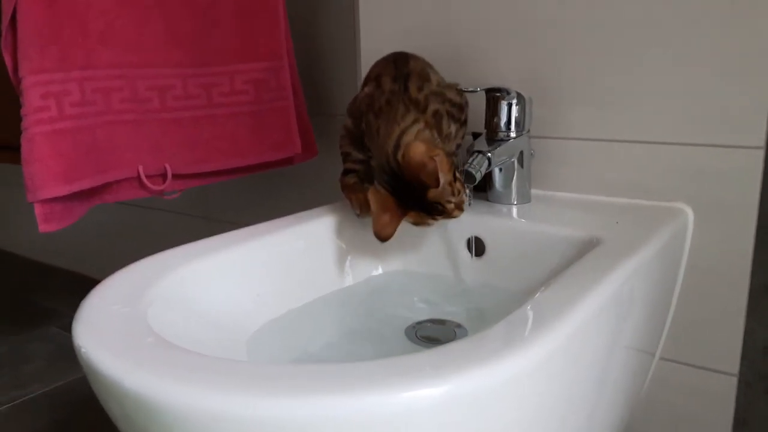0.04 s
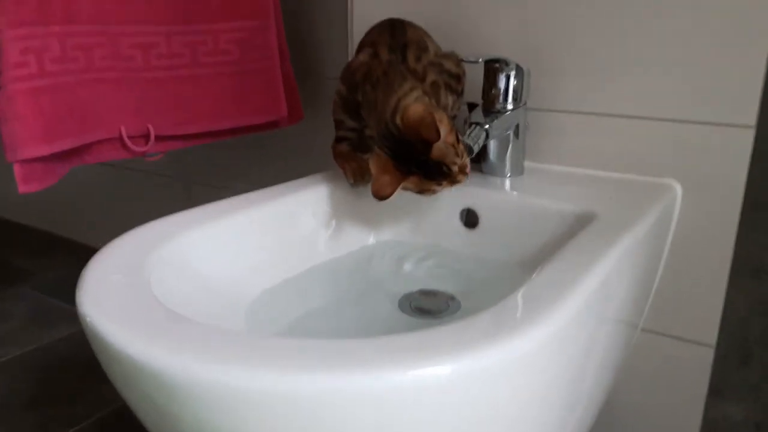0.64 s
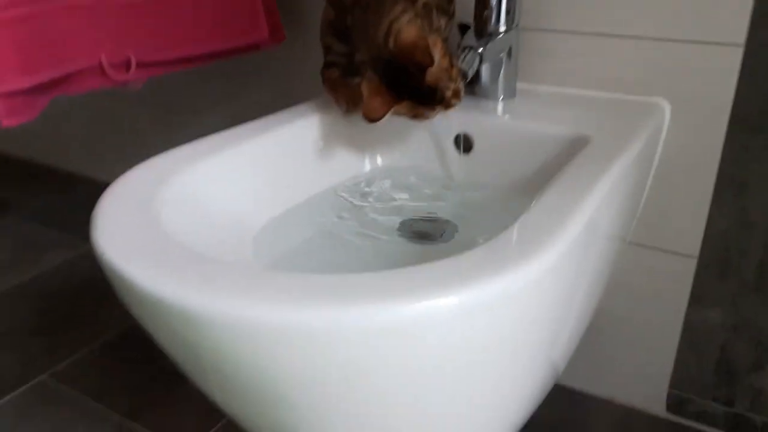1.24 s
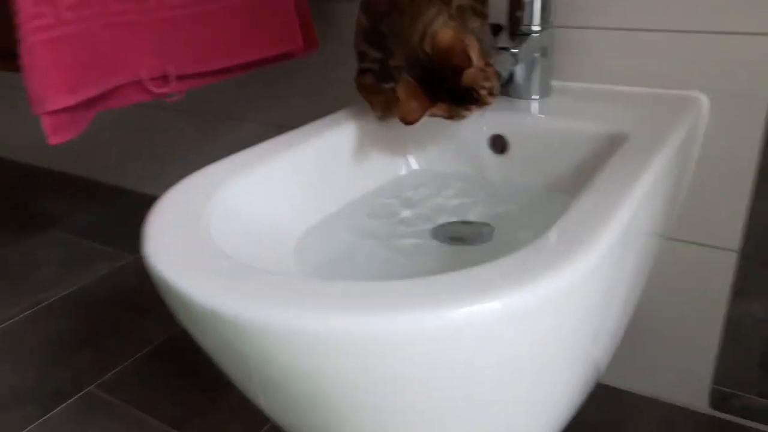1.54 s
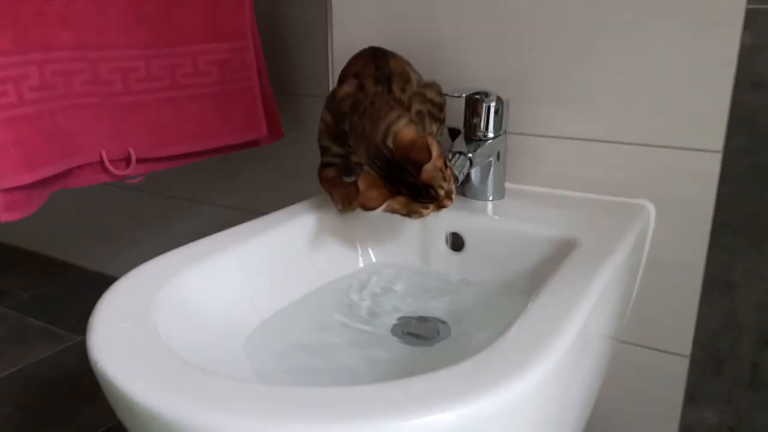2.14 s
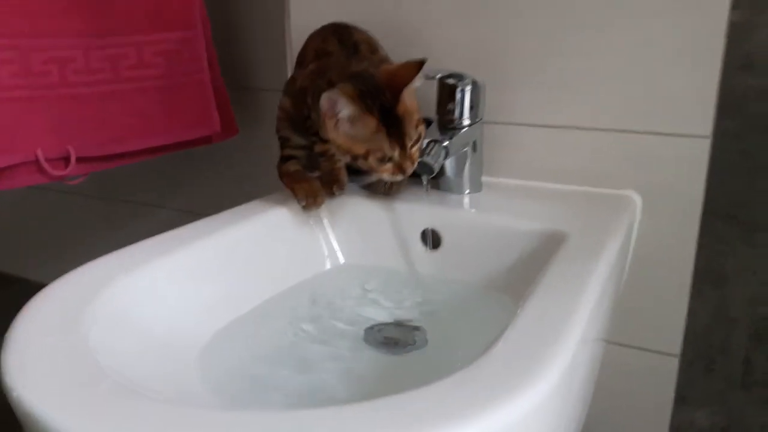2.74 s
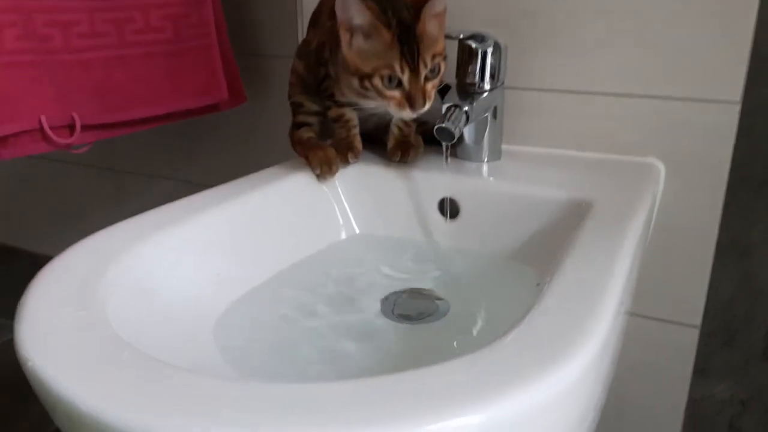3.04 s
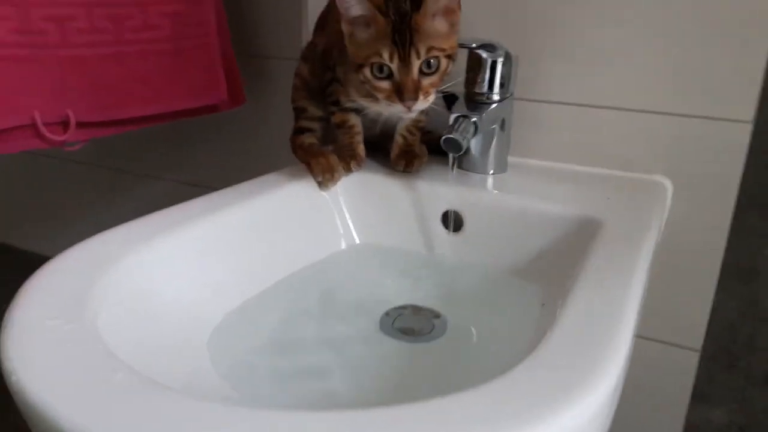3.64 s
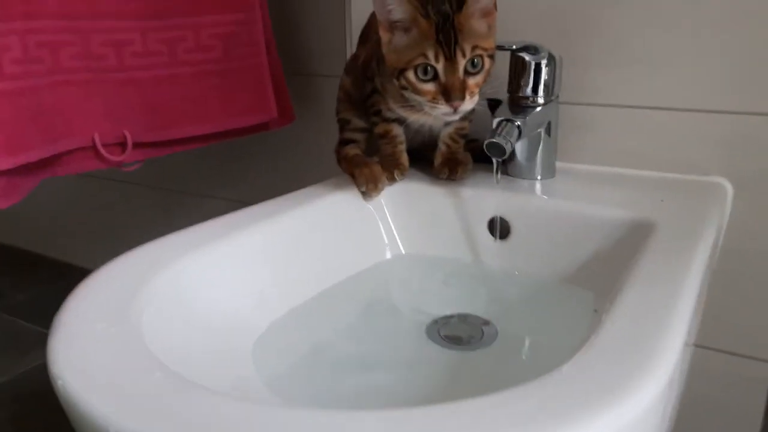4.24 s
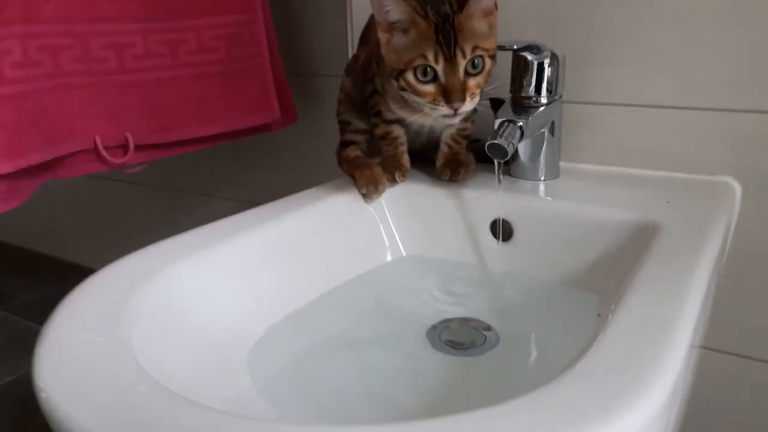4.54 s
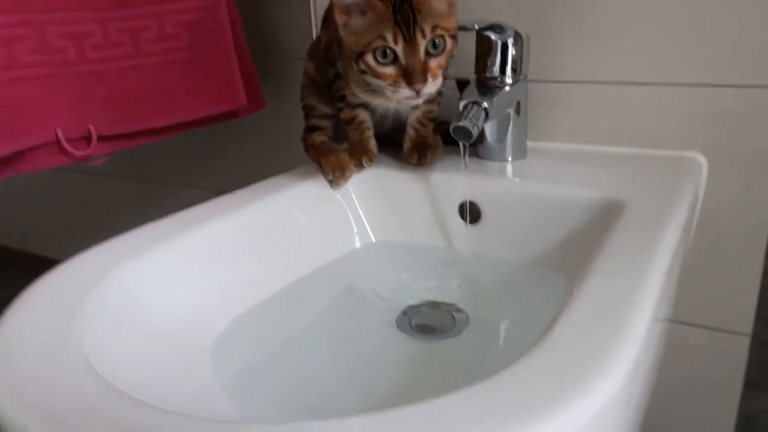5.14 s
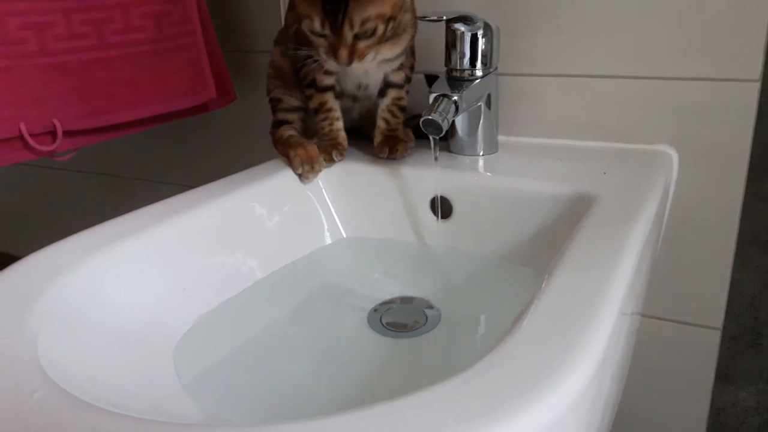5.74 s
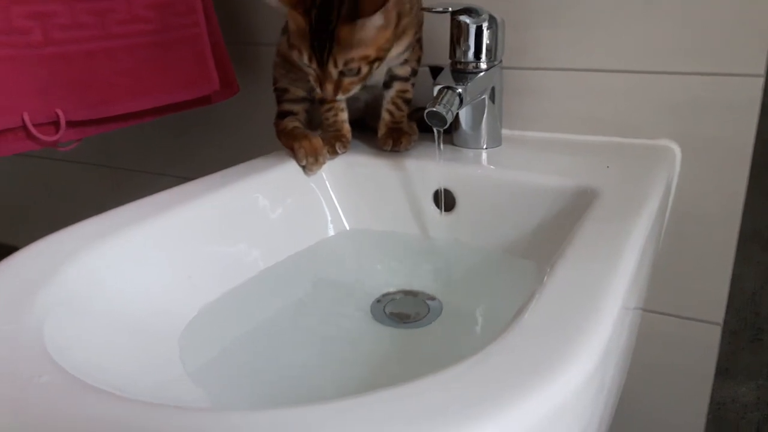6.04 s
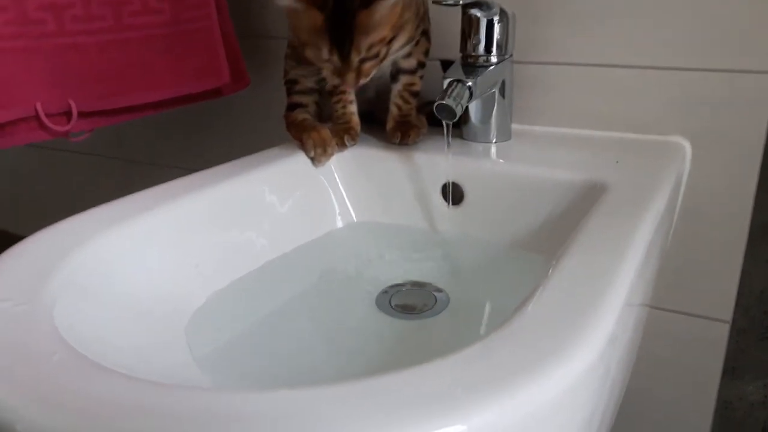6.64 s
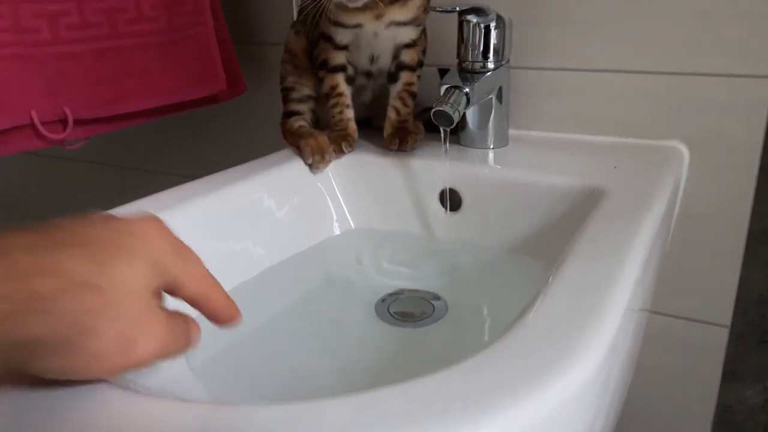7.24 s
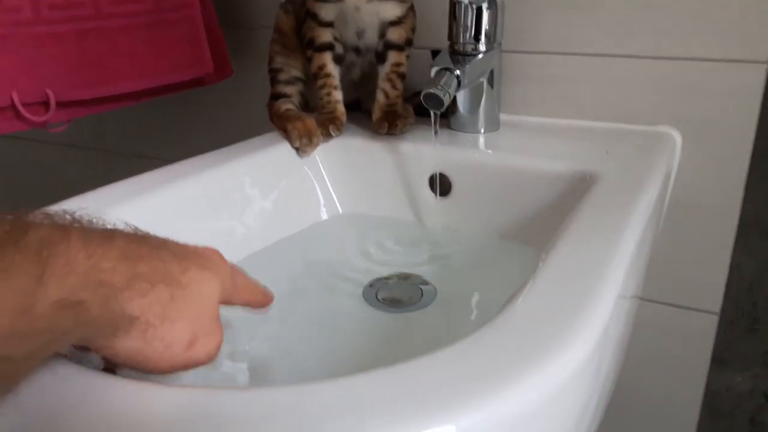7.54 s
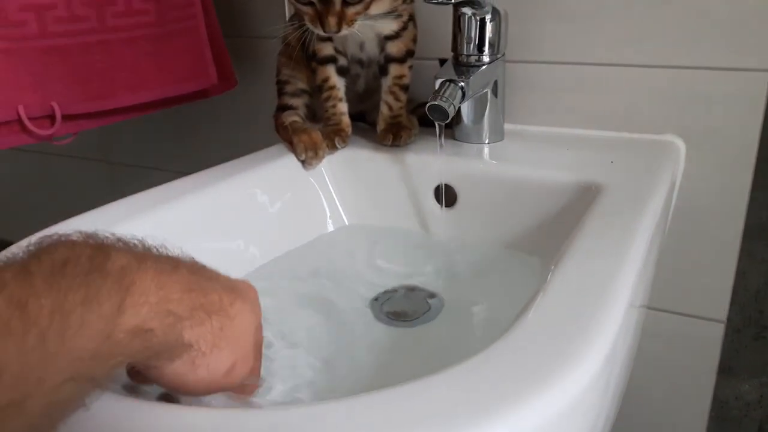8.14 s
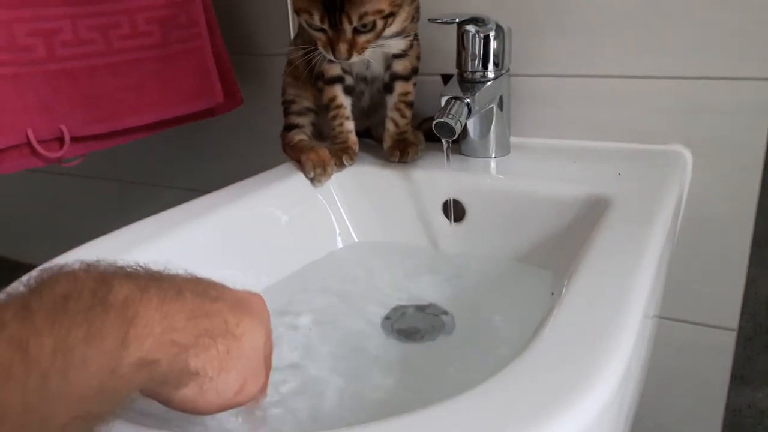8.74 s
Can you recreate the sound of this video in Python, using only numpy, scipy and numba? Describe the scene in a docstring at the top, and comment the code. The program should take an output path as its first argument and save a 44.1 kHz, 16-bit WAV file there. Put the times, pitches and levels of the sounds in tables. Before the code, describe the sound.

Water trickles softly from a tap into standing water in a small bathroom, with loud handling bumps and rubbing at the start.

```python
"""A small tiled bathroom, where a thin stream from a tap trickles into a partly filled ceramic basin.
The stream traps air: big bubbles plop, small ones plink with a rising pitch, and the tiles echo them.
For the first two seconds fingers rub and knock on the phone's case, right next to the microphone;
then the hand settles with soft creaks. Near the end a finger stirs the water. Quiet room air lies below."""
import sys
import numpy as np
from scipy import signal
from scipy.fft import rfft, irfft
from scipy.io import wavfile
from scipy.ndimage import uniform_filter1d
from numba import njit

SR = 44100
rng = np.random.default_rng(int(sys.argv[2]) if len(sys.argv) > 2 else 0)


def log_audio(samples):
    """Write samples as a 16-bit WAV file to the path given in sys.argv[1]."""
    # one column per channel
    frames = np.atleast_2d(samples).T
    # limit to full scale, then quantise
    limited = np.clip(frames, -1, 1)
    pcm = np.round(limited * 32767).astype(np.int16)
    wavfile.write(sys.argv[1], SR, pcm)


N = 388080
TIME = np.arange(N) / SR

# the stream slowly weakens: (time [s], big bubble level [dB], small bubble level [dB])
STREAM_FLOW = [(1.9, -63, -65), (2.3, -56, -68), (2.7, -50.5, -59), (2.95, -65, -70), (3.25, -54.5, -62),
               (3.6, -64.5, -67), (3.85, -65, -64.5), (4.4, -58, -66.5), (5.0, -61, -69.5), (5.6, -58, -68),
               (6.0, -64, -71.5), (6.7, -63, -71), (7.1, -63, -64), (7.35, -63.5, -74), (7.75, -59.5, -69),
               (8.2, -72, -72), (8.55, -57.5, -67.5), (8.8, -73, -73.5)]
# the stream falters and traps less air: (time [s], length [s])
STREAM_LULLS = [(1.918, 0.13), (2.873, 0.048), (4.063, 0.07), (4.638, 0.051), (5.085, 0.203),
                (6.399, 0.061), (6.987, .06), (7.362, 0.12), (8.099, 0.17)]
# the size of the big bubbles wanders: (time [s], pitch [Hz])
GURGLE_PITCH = [(2.0, 816), (3.13, 741.4), (3.21, 620), (3.42, 800), (3.52, 695), (4.58, 677), (4.69, 758),
                (6.45, 687), (6.83, 801), (6.96, 730.5), (8.23, 677), (8.5, 861), (8.53, 698), (8.8, 748)]
# spectra of splashing water and of ticking droplets: (frequency [Hz], level [dB])
SPLASH_COLOUR = [(300, -15), (700, 5.5), (1150, 5), (1700, -6.5), (2500, -7.5), (3700, -17.5),
                 (4600, -24.5), (9000, -34), (16000, -34)]
TICK_COLOUR = [(4000, -32), (9000, -11.5), (12500, -4), (15500, -0.5)]
def trickle():
    """The stream in the basin: a gurgle of big bubbles, a chatter of small ones, splash and spatter."""
    lulls = sum(envelope(s, length, attack_s=.0073, release_s=.0073) for s, length in STREAM_LULLS)
    big_db, small_db = curves(STREAM_FLOW) - 6.5 * lulls
    gurgle_hz, = curves(GURGLE_PITCH)
    gurgle = swarm(gurgle_hz, per_s=90, octaves=.18, cycles=12, rise=.03, swell=.21, spread_db=13)
    middle = swarm(1180, per_s=90, octaves=.34, cycles=10, rise=.05, swell=.25, spread_db=16.5)
    chatter = swarm(2380, per_s=130, octaves=.54, cycles=8, rise=.13, swell=.32, spread_db=21.5)
    chatter *= undb(1.7 * wander(9))  # the stream wobbles, so small bubbles come in bunches
    splash = unit(colour(crackle(900, 4.5), SPLASH_COLOUR))
    spatter = unit(colour(crackle(25, 3.3), TICK_COLOUR))
    fine = undb(-1.7) * middle + undb(-5.5) * chatter + undb(-4) * splash + undb(-22.5) * spatter
    return undb(big_db - 1.5) * gurgle + undb(small_db) * fine


def bubble(hz, cycles, rise, swell):
    """A trapped bubble swells, climbs in pitch as it nears the surface and dies after some cycles."""
    age = np.linspace(0, 1, int(cycles / hz * SR))
    pitch = hz * (1 + rise * age)
    strength = age ** swell * (1 - age) ** 2
    return np.sin(2 * np.pi * np.cumsum(pitch) / SR) * strength / strength.max()


def swarm(centre_hz, per_s, octaves, cycles, rise, swell, spread_db):
    """Bubbles born at random around a pitch or a pitch curve, at an rms of 1."""
    out = np.zeros(N)
    centre_hz = np.broadcast_to(centre_hz, N)
    for when, size, detune, life, lift in rng.random((int(per_s * N / SR), 5)):
        hz = centre_hz[int(when * N)] * 2 ** (octaves * (2 * detune - 1))
        ring = bubble(hz, cycles * (.5 + life), 2 * rise * lift, swell)
        add(out, when * N / SR, undb(spread_db * size) * ring)
    return unit(out)


# the loudest big bubbles: (time [s], level [dB], pitch [Hz])
PLOPS = [(.694, -46, 956), (1.868, -48, 925), (2.07, -32, 846), (2.154, -33, 832), (2.26, -30.5, 760),
         (2.295, -37, 857), (2.441, -46, 880), (2.772, -47, 753), (2.975, -44, 773), (3.058, -31.5, 768),
         (3.176, -41, 603), (3.342, -41.5, 766), (3.718, -42.5, 695), (3.961, -43, 679), (4.005, -44, 654),
         (4.202, -47, 684), (4.259, -47, 772), (4.475, -46.5, 631), (4.837, -48.5, 800),
         (4.995, -40.5, 710), (5.036, -50, 699), (5.29, -37, 760), (5.365, -46.5, 713), (5.674, -45.5, 703),
         (6.522, -43.5, 700), (6.715, -44.5, 804), (6.914, -47.5, 708), (7.072, -41, 723),
         (7.154, -42.5, 768), (7.249, -45.5, 714), (7.851, -48, 717), (8.345, -44.5, 785),
         (8.399, -44.5, 713), (8.496, -43, 960), (8.528, -46.5, 666)]
# the loudest small bubbles at the surface: (time [s], level [dB], nominal pitch [Hz])
PLINKS = [(2.241, -45, 2700), (2.328, -52, 2940), (2.524, -55, 2940), (2.866, -54.5, 2150),
          (2.961, -55, 2230), (3.281, -60, 2310), (3.596, -51, 2640), (3.715, -53.5, 2500),
          (3.846, -52, 2200), (4.363, -50, 2280), (4.657, -55, 2260), (4.747, -52, 2390),
          (4.817, -50.5, 2180), (5.035, -55, 2960), (5.244, -50.5, 1860), (5.504, -50, 1840),
          (5.587, -51, 2140), (5.714, -47.5, 2040), (6.137, -53, 2000), (6.418, -55, 2140),
          (7.645, -51.5, 2620), (8.27, -43, 2660)]
# drops bursting into spray: (time [s], level [dB], decay time [s])
SPLASHES = [(2.24, -57.5, 0.11), (3.225, -69, 0.073), (3.51, -52.5, 0.021), (3.719, -55.5, 0.019),
            (3.955, -53, 0.019), (4.475, -54.5, 0.024), (5.362, -52.5, 0.0097), (5.70, -64.5, .03),
            (5.29, -55, 0.015), (7.072, -56.5, 0.046), (8.268, -55, 0.028), (8.344, -54.5, 0.012),
            (8.495, -55.5, 0.028)]
def drips(smack_s=.0065):
    """Single drops smack the water, trap loud bubbles or burst into spray."""
    bubbles, smacks = np.zeros((2, N))
    t = np.arange(SR // 5) / SR
    for s, db, hz in PLOPS:
        add(bubbles, s, undb(db - 1) * bubble(hz, cycles=17.3, rise=.05, swell=.25))
        add(smacks, s, undb(db - 19) * noise_burst(t, smack_s))
    for s, db, hz in PLINKS:
        plink = bubble(.96 * hz, cycles=rng.uniform(17, 21.6), rise=.53, swell=.28)
        add(bubbles, s, undb(db - 1) * plink)
    for s, db, decay_s in SPLASHES:
        add(smacks, s, undb(db) * crackle(3000, 2.7)[:len(t)] * np.exp(-t / decay_s))
    return bubbles + colour(smacks, SPLASH_COLOUR)


# droplets landing: (time [s], high tick level [dB], lower click level [dB])
DROPLET_HITS = [(1.862, -46, -47), (2.0968, -49, -52.5), (2.178, -46, -52), (2.326, -41, -51.5),
                (2.524, -44.5, -56), (2.7641, -54, -57), (3.7204, -58.5, -77), (3.961, -58, -75),
                (4.8364, -54, -62), (4.9097, -52, -83), (5.0495, -47.5, -72), (5.362, -49, -55.5),
                (6.321, -54, -62), (6.3494, -54, -69), (6.4735, -53, -62), (6.5565, -57, -59.5),
                (8.2681, -53, -78), (8.7574, -48.5, -54.5)]
# spectrum of the lower click: (frequency [Hz], level [dB])
CLICK_COLOUR = [(1500, -9), (4300, -4), (7000, -3), (11000, -37), (15000, -31)]
def droplets(impact_s=.00085, mist_s=.068):
    """Droplets tick on the ceramic and the tap; fine spray settles after each impact."""
    ticks, clicks = np.zeros((2, N))
    t = np.arange(SR // 5) / SR
    for s, tick_db, click_db in DROPLET_HITS:
        impact, mist = noise_burst(t, impact_s), noise_burst(t, mist_s)
        add(ticks, s, undb(tick_db - 3) * (impact + .093 * mist))
        add(clicks, s, undb(click_db - 5) * (impact + .12 * mist))
    return colour(ticks, TICK_COLOUR) + colour(clicks, CLICK_COLOUR)


def breakup(count=3, wait_s=.015, span_s=.07, octaves=.12):
    """Each plop breaks up into a few weaker bubbles near its own pitch, the later the softer."""
    out = np.zeros(N)
    for s, db, hz in PLOPS:
        for late, detune in rng.random((count, 2)):
            pitch = hz * 2 ** (octaves * (2 * detune - 1))
            ring = bubble(pitch, cycles=18.5, rise=.034, swell=.18)
            add(out, s + wait_s + span_s * late, undb(db - 14.5 - 6 * late) * ring)
    return out


# finger strokes beside the microphone:
# (time [s], length [s], drag level [dB], hiss level [dB], hollow resonance [Hz], treble gain [dB])
FINGER_STROKES = [(.008, 0.031, -28.5, -42, 528, -10.5), (0.074, 0.097, -46, -55.5, 694, -7.5),
                  (0.147, 0.13, -49, -58.5, 571, -6.5), (0.295, .1, -51.5, -63, 610, -6.5),
                  (0.383, 0.049, -38.5, -56, 531, -1), (0.452, 0.14, -41.5, -55, 1000, -4),
                  (0.757, 0.1, -44, -49, 900, -8), (0.852, 0.094, -41.5, -48, 947, 0.5),
                  (0.989, 0.057, -40, -51, 830, 1), (1.054, 0.087, -41, -47.5, 720, -1.5),
                  (1.151, 0.12, -32.5, -45, 600, -1.5), (1.272, 0.048, -37.5, -55, 620, -5.5),
                  (1.321, .085, -39, -58, 662, 0), (1.412, 0.11, -36, -57, 1130, 1.5),
                  (1.529, 0.066, -37, -44, 727.6, 0), (1.622, 0.14, -45, -57, 722, 3.5),
                  (1.769, 0.013, -33.5, -51.5, 480, -6)]
# spectra of the case's rumble, the skin's drag and its hiss: (frequency [Hz], level [dB])
RUMBLE_COLOUR = [(25, -17), (50, -3.5), (85, 9), (170, 6.5), (280, -2), (600, -34.5)]
DRAG_COLOUR = [(130, -24.5), (230, 3), (550, -3.5), (1050, -5), (1400, -8.5), (2000, -26.5), (4000, -54)]
HISS_COLOUR = [(900, -17.5), (1600, 1.5), (2300, -2.5), (3300, -4.5), (4100, -15.5), (5600, -12),
               (6600, -6.5), (7800, -19.5), (11000, -24.5), (13500, -20), (16000, -28)]
HANDLING_S = 1.81
def rubbing(release_s=.016):
    """Skin sticks and slips on the case; the harder it drags, the more the case rumbles."""
    starts, lengths, drag_db, hiss_db, hz, treble = np.transpose(FINGER_STROKES)
    strokes = np.array([envelope(s, span, .42 * span, release_s) for s, span in zip(starts, lengths)])
    force, speed = undb(drag_db) @ strokes, undb(hiss_db) @ strokes
    creep = envelope(0, HANDLING_S, release_s, release_s)  # the fingers creep between strokes too
    hollow_hz, treble_db = curves(np.transpose([starts + lengths / 2, hz, treble]))
    rumble = unit(colour(crackle(3000, 2.9), RUMBLE_COLOUR))
    rumble *= np.hypot(undb(-9.5) * force, undb(-54) * creep)
    slips = phone_case(colour(crackle(4000, 3.6), DRAG_COLOUR))
    # the hollow between finger and microphone port rings, and changes size as the finger moves
    hollow = undb(4) * resonate(slips, hollow_hz, q=2.7)
    drag = unit(slips + hollow) * np.hypot(force, undb(-58.5) * creep)
    fine_slips = phone_case(colour(crackle(12000, 2), HISS_COLOUR))
    hiss = unit(brighten(fine_slips, treble_db)) * np.hypot(speed, undb(-66) * creep)
    return rumble + (undb(.1) * drag + undb(1) * hiss) * undb(1.77 * wander(50.04))


# knocks beside the microphone: (time [s], thud level [dB], thud pitch [Hz], nail click level [dB])
FINGER_KNOCKS = [(0.015, -2, 390, -16), (.0349, -8.5, 384, -30), (.09, -27.5, 780, -37.5),
                 (0.3955, -4, 520, -4.5), (.406, -12, 106, -30), (.428, -17.5, 200, -25),
                 (0.4536, -18.5, 165, -29), (.491, -28, 900, -32), (0.5063, -3.5, 1060, -21),
                 (.763, -28, 864, -38.5), (0.822, -24, 134, -51), (.921, -26, 141, -50),
                 (1.038, -28, 130, -50), (1.412, -10.5, 756, -24.5), (1.6035, -13, 270, -47.5),
                 (1.65, -30, 400, -29.5), (1.7482, -28, 444, -37), (1.7683, -10, 327, -22.5),
                 (1.781, -6, 395, -19), (1.7945, -8, 380, -18.5), (1.7956, -5.5, 550, -8.5),
                 (1.8036, -40, 600, -25), (2.552, -33.5, 305, -61), (2.672, -37, 219, -51),
                 (2.806, -32.5, 203, -61), (3.729, -27.5, 840, -62), (4.076, -32.5, 540, -57),
                 (4.1617, -26, 604, -52.5), (4.353, -37.5, 495, -54), (5.542, -37, 316, -64),
                 (5.559, -38, 390, -58)]
# spectrum of a nail's click: (frequency [Hz], level [dB])
NAIL_COLOUR = [(300, -8.5), (1400, 7), (2500, 0.5), (4000, -1), (6600, -1.5), (8000, -19.5), (11000, -30.5),
               (15000, -35)]
def knocking(decay_cycles=.39, scrape_s=.0013):
    """Each knock of a finger on the case is a heavily damped thud with a brief click on top."""
    thuds, clicks = np.zeros((2, N))
    t = np.arange(SR // 20) / SR
    for s, db, hz, nail_db in FINGER_KNOCKS:
        strength = np.exp(-t * hz / decay_cycles) * (1 - np.exp(-6 * hz * t))
        add(thuds, s, undb(db) * np.sin(2 * np.pi * hz * t) * strength)
        scrape = .45 * noise_burst(t, scrape_s)
        scrape[0] = 3.7  # first contact, then a short scrape
        add(clicks, s, undb(nail_db) * scrape)
    return phone_case(undb(3) * thuds + undb(-6) * colour(clicks, NAIL_COLOUR))


# resonances of the case: (frequency [Hz], width [Hz], level against the direct path [dB])
CASE_MODES = [(204, 30, -9), (575, 45, -0.5), (2350, 160, -7), (4420, 280, -9), (6050, 50, 1.5),
              (6330, 80, 2)]
def phone_case(x):
    """The case passes a push straight on to the microphone and rings a little."""
    return x + sum(undb(db) * signal.lfilter(*signal.iirpeak(hz, hz / width, fs=SR), x)
                   for hz, width, db in CASE_MODES)


# small shifts of the hand around the microphone: (time [s], length [s], level [dB])
GRIP_SHIFTS = [(1.808, 0.076, -52), (2.353, .07, -49.5), (2.511, 0.097, -50), (2.728, 0.075, -51),
               (3.42, 0.59, -58.5), (4.31, .2, -61.5), (6.297, 0.34, -68.5), (8.243, 0.034, -60),
               (8.752, 0.043, -55)]
def gripping(rest_db=-62, settle_db_per_s=1.9):
    """The hand grows stiller on the case and creaks softly whenever it shifts."""
    spectrum = [(30, -18.5), (80, -1.5), (170, 2.5), (400, -1), (800, -1.5), (3000, -42.5)]
    creak = unit(colour(crackle(700, 2.3), spectrum))
    shifts = sum(undb(db) * envelope(s, length, attack_s=.061, release_s=.023)
                 for s, length, db in GRIP_SHIFTS)
    resting = undb(rest_db - settle_db_per_s * np.maximum(TIME - HANDLING_S, 0))
    return creak * np.hypot(shifts, resting)


# sloshing in the basin: (time [s], level [dB])
SLOSH_LEVEL = [(7.4, -93.5), (7.7, -71), (8.0, -71), (8.3, -63), (8.55, -64), (8.8, -71)]
def stirring():
    """A finger pushes the water about with a soft low slosh."""
    slosh_db, = curves(SLOSH_LEVEL)
    spectrum = [(25, -5), (60, 1), (120, 0), (200, -5.5), (400, -22), (1500, -46.5)]
    slosh = unit(colour(rng.standard_normal(N), spectrum))
    return slosh * undb(slosh_db + 1.5 * wander(16))


def bathroom(x, t60_s=.452, tail_db=-5, echo_s=.028, echo_db=-12):
    """The microphone hears the direct sound, one clear bounce off the tiles and a short bright tail."""
    t = np.arange(SR // 2) / SR
    tail = noise_burst(t, t60_s / np.log(1000)) * np.minimum(t / .0041, 1)
    response = undb(tail_db) * tail / np.linalg.norm(tail)
    response[0] += 1
    response[int(echo_s * SR)] += undb(echo_db)
    return signal.fftconvolve(x, response)[:N]


# spectrum of the room tone: (frequency [Hz], level [dB])
AIR_COLOUR = [(25, -4.5), (50, -0.5), (110, -0.5), (230, -2), (450, -10.5), (1000, -16), (2500, -16),
              (4500, -32.5), (9000, -35.5), (13000, -31), (15500, -30)]
def room_air():
    """Quiet, steady air all around the microphone."""
    return undb(-66.5) * unit(colour(rng.standard_normal(N), AIR_COLOUR))


def undb(db):
    """Decibels to gain."""
    return 10 ** (np.asarray(db) / 20)


def unit(x):
    """Scale to an rms of 1."""
    return x / np.sqrt(np.mean(x ** 2))


def curves(table):
    """The columns of a table of (time [s], ...) rows, one value a sample."""
    s, *columns = np.transpose(table)
    return [np.interp(TIME, s, c) for c in columns]


def add(out, s, sound):
    """Mix a sound in at a time."""
    i = int(np.clip(s * SR, 0, N - 1))
    out[i:i + len(sound)] += sound[:N - i]


def envelope(s, length, attack_s, release_s):
    """Rises from time s, holds until s + length and dies away."""
    attack = np.clip((TIME - s) / attack_s, 0, 1)
    return attack * np.exp(-np.clip((TIME - s - length) / release_s, 0, 20))


def wander(per_s):
    """A smooth random curve with an rms of 1."""
    step = int(SR / per_s)
    stairs = np.repeat(rng.standard_normal(N // step + 1), step)
    return unit(uniform_filter1d(stairs, step)[:N])


def crackle(per_s, spread_db):
    """Random tiny impulses of uneven size."""
    hits = rng.random(N) < per_s / SR
    return unit(hits * rng.standard_normal(N) * undb(spread_db * rng.standard_normal(N)))


def noise_burst(t, decay_s):
    """White noise that dies away."""
    return rng.standard_normal(len(t)) * np.exp(-t / decay_s)


def colour(x, points, size=4096):
    """Causal filter of unit power through (frequency [Hz], level [dB]) points."""
    hz, db = np.transpose(points)
    bins_hz = np.maximum(np.arange(size // 2 + 1) * SR / size, 1)
    gain = undb(np.interp(np.log(bins_hz), np.log(hz), db))
    cepstrum = irfft(np.log(gain))
    cepstrum[1:size // 2] *= 2  # fold for minimum phase
    cepstrum[size // 2 + 1:] = 0
    response = irfft(np.exp(rfft(cepstrum)))
    return signal.fftconvolve(x, response / np.linalg.norm(response))[:N]


@njit
def resonate(x, hz, q):
    """Band-pass with a moving centre, gain 1 there."""
    y, band, low = np.empty(len(x)), 0., 0.
    for i in range(len(x)):
        g = np.tan(np.pi * hz[i] / SR)
        v = (band + g * (x[i] - low)) / (1 + g * (g + 1 / q))
        band, low, y[i] = 2 * v - band, low + 2 * g * v, v / q
    return y


def brighten(x, db):
    """Lift or lower the treble by a curve."""
    dull = signal.sosfiltfilt(signal.butter(3, 4800, fs=SR, output="sos"), x)
    return dull + undb(db) * (x - dull)


def scene(knock_to_room_db=-26):
    """Water out in the room, the hand right at the microphone and room air behind both."""
    air = room_air()
    knocks = knocking()
    water = trickle() + drips() + droplets() + breakup() + stirring()
    room = bathroom(water + undb(knock_to_room_db) * knocks)
    return (room + rubbing() + gripping() + knocks + air)[None]


def record(dry, low_hz=55, top_hz=15900):
    """The phone thins the deep bass and cuts the top."""
    thin = signal.sosfilt(signal.butter(3, low_hz, "high", fs=SR, output="sos"), dry)
    return signal.sosfilt(signal.ellip(10, .2, 70, top_hz, fs=SR, output="sos"), thin)


dry = scene()
out = record(dry)
log_audio(out)
```